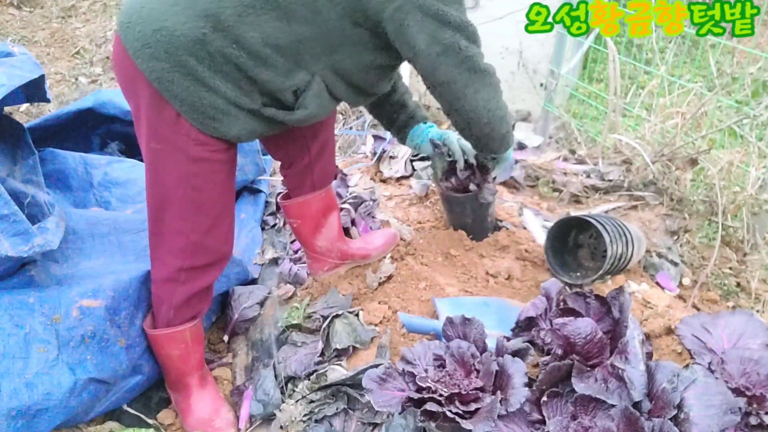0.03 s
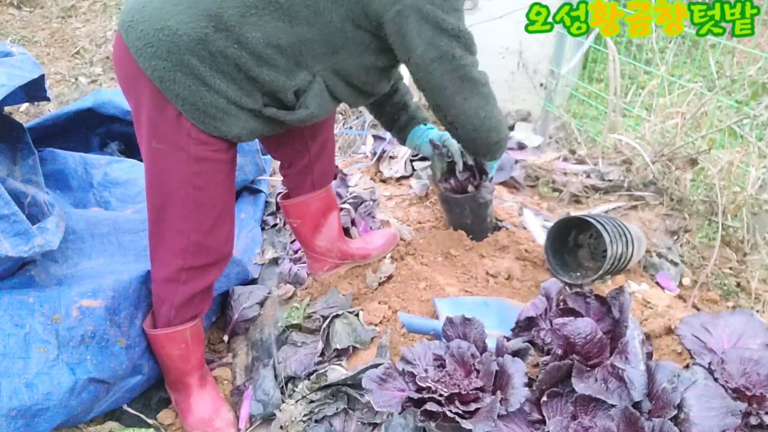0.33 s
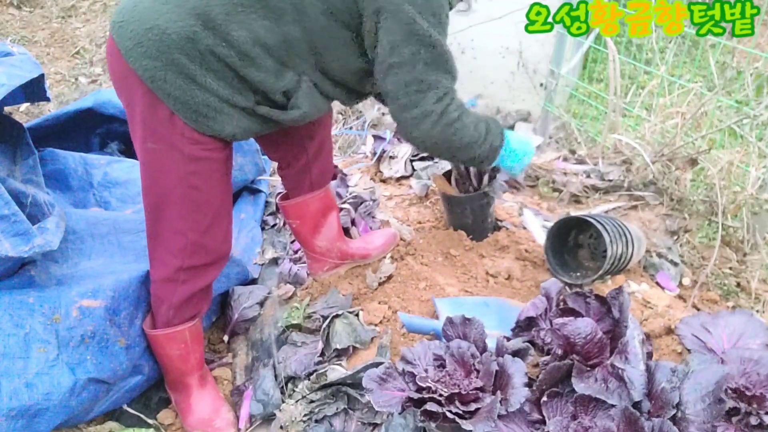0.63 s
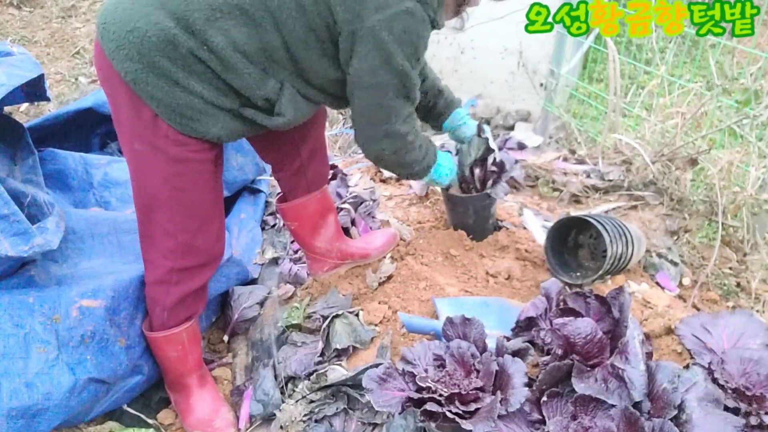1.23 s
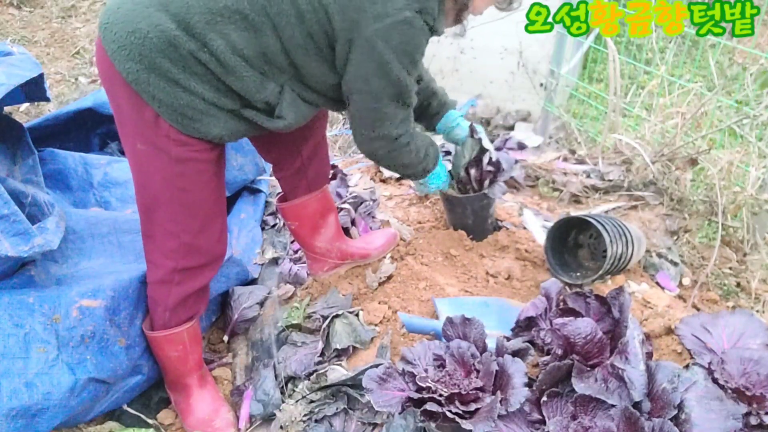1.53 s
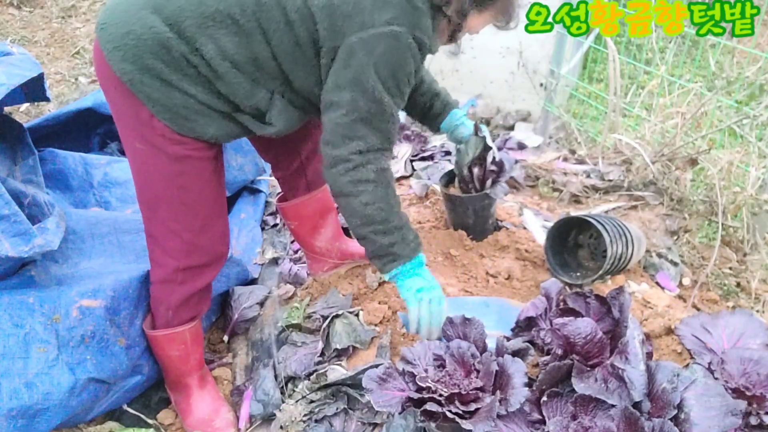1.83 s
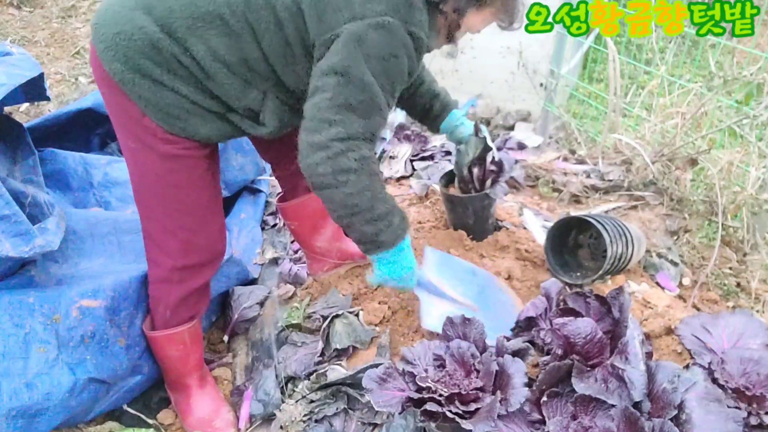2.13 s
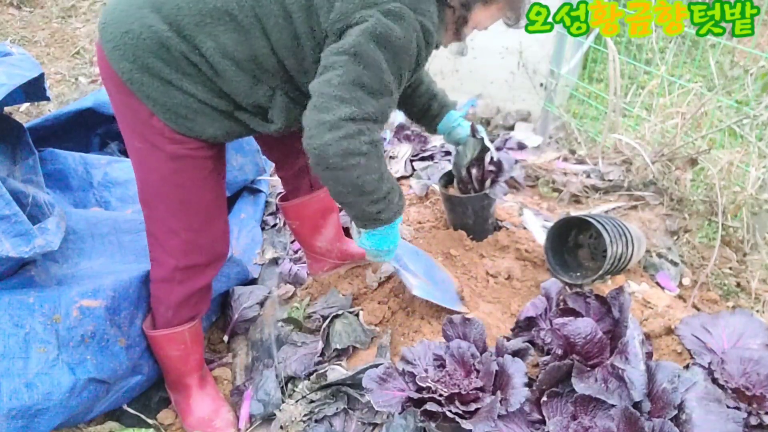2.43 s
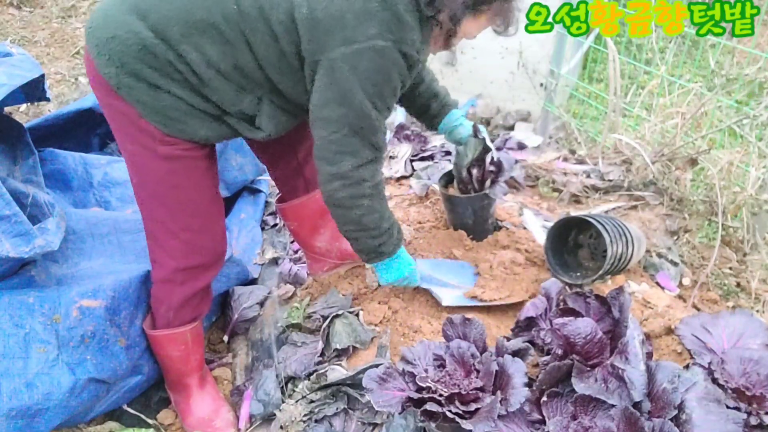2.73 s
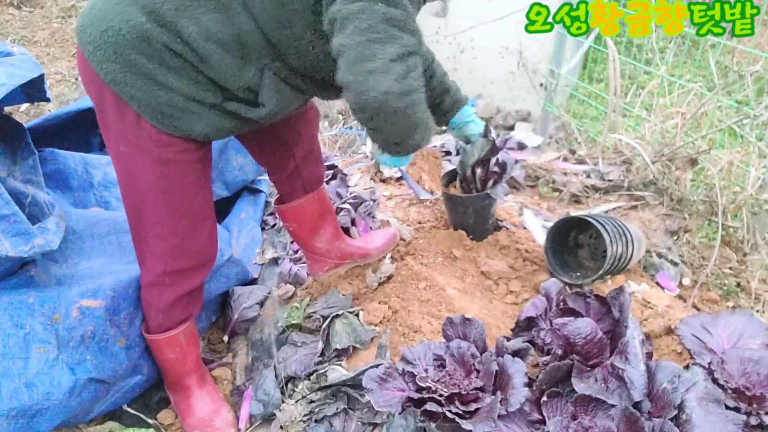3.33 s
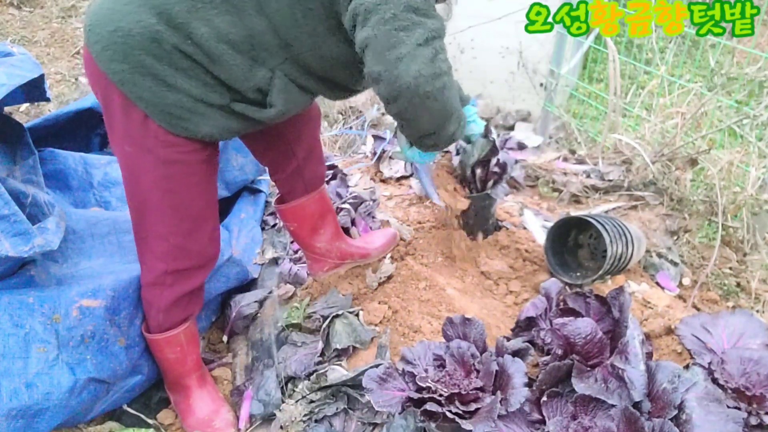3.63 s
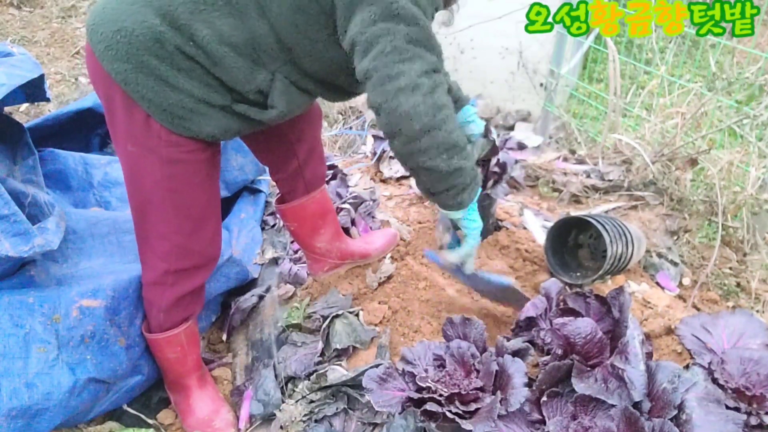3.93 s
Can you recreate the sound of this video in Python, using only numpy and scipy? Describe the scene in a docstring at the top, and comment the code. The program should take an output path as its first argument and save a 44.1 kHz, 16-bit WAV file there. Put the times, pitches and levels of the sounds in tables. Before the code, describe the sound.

Outdoors and close up, a trowel pushes once into stony soil, its blade ringing, after some faint leaf rustling. A light knock on a plant pot and trickling soil follow, while wind and handling noise rumble on the microphone.

```python
"""Outdoors at a plastic plant pot, close up, on a hand-held stereo microphone. A gardener settles a plant,
its leaves crackling, lifts a steel trowel and pushes it once into gritty soil, where grains and small
stones set the blade ringing. The trowel knocks on the rim and crumbs trickle into the pot.
Wind rumbles on the microphone, fingers bump and rub its body, and a hush with a faint drone lies far off."""
import sys
import numpy as np
from scipy import signal
from scipy.fft import rfft, irfft
from scipy.io import wavfile
from scipy.ndimage import uniform_filter1d

SR = 44100
rng = np.random.default_rng(int(sys.argv[2]) if len(sys.argv) > 2 else 0)


def store_wav(level_fs):
    """Save 16-bit WAV to argv[1]."""
    pcm = np.round(np.clip(np.atleast_2d(level_fs), -1, 1) * 32767)
    wavfile.write(sys.argv[1], SR, pcm.T.astype(np.int16))


N = 176400
T = np.arange(N) / SR
LN_1000 = np.log(1000)  # time constants in a t60, a fall of 60 dB


def from_db(db):
    """Decibels to gain."""
    return 10 ** (np.asarray(db) / 20)

def rms_one(x):
    """Scale to unit power."""
    return x / np.sqrt(np.mean(x ** 2) + 1e-20)

def curve(rows, outside=None):
    """Each column of a table, joined by straight lines over time."""
    times, *columns = np.transpose(rows)
    return [np.interp(T, times, column, outside, outside) for column in columns]

def at_hz(points, hz):
    """Read a table on a log-frequency axis."""
    freqs, values = np.transpose(points)
    return np.interp(np.log(hz + 1), np.log(freqs), values)

def pan(db):
    """Constant-power gains, left louder than right by db."""
    return rms_one(from_db(np.array([[db], [-db]]) / 2))

def drift(per_s):
    """A random wander of about unit spread that turns this often."""
    points = np.clip(rng.standard_normal(2048), -2, 2)
    return np.interp(T * per_s, np.arange(len(points)), points)

def swell(s, width):
    """A bell-shaped rise and fall."""
    return np.exp(-.5 * ((T - s) / width) ** 2)

def burst(s, db, decay_s, attack_s):
    """A straight rise, then an exponential decay."""
    rise = np.clip((T - s) / attack_s, 0, 1)
    return from_db(db) * rise * np.exp(-np.maximum(T - s - attack_s, 0) / decay_s)

def ring(x, hz, t60):
    """A resonance: each click sets a damped sine ringing."""
    radius, angle = from_db(-60 / (t60 * SR)), 2 * np.pi * hz / SR
    return signal.lfilter([1, 0, -1], [2, -4 * radius * np.cos(angle), 2 * radius ** 2], x + 1e-18)

def sustained(modes, width=0.39, even_s=0.039):
    """Stereo modes kept ringing by noise, their level evened out over even_s."""
    out = 0
    for hz, db, t60 in modes:
        tone = ring(rng.standard_normal((2, N)), hz, t60)
        mid, side = tone / np.sqrt(uniform_filter1d(tone ** 2, int(even_s * SR)) + 1e-12)
        out += from_db(db) * (mid + width * side * [[1], [-1]])
    return out

def grains(per_s, spread_db):
    """Two streams of tiny random impacts, their sizes scattered by spread_db."""
    chance = rng.random((2, N)) * SR / per_s
    out, hit = np.zeros((2, N)), chance < 1
    sizes = from_db(spread_db * np.minimum(-np.log(chance[hit]), 4))
    out[hit] = np.sign(rng.random((2, N))[hit] - .5) * sizes
    return out

def pings(per_s, spread_db, cycles, patch_db=2.8, patch_s=.014):
    """Grains ring for a few cycles each; the contact point shifts, so each pitch comes and goes."""
    pitches, out = np.geomspace(700, 15000, num=20), 0
    for hz in pitches:
        patch = from_db(patch_db * drift(1 / patch_s))
        clicks = grains(per_s * np.sqrt(hz) / np.sqrt(pitches).sum(), spread_db) * patch
        out += np.sqrt(hz) * rms_one(ring(clicks, hz, cycles / hz))
    return out

def focus(x, hz, db=-7.5, cycles=3.7):
    """A broad resonance favours one pitch region of a texture."""
    return rms_one(x + from_db(db) * rms_one(ring(x, hz, cycles / hz)))

# Sounds close to the microphone. Each row: frequency in Hz, left-right likeness from -1 to 1.
CLOSE_STEREO = [(500, 0.69), (1300, 0.43), (2500, 0.6), (4400, 0.24), (8000, 0.16), (15000, 0)]
def colour(pair, spectrum, likeness=CLOSE_STEREO):
    """Two unrelated signals become one stereo texture of unit power, shaped by this spectrum."""
    hz = np.arange(N // 2 + 1) * SR / N
    alike = np.clip(at_hz(likeness, hz), -1, 1)
    low_cut = np.minimum(hz / spectrum[0][0], 1) ** 2
    mid, side = rfft(pair) * from_db(at_hz(spectrum, hz)) * low_cut
    return rms_one(irfft(np.sqrt(1 + alike) * mid + np.sqrt(1 - alike) * side * [[1], [-1]], N))


# The far hush. Each row: frequency in Hz, relative level in dB.
HUSH_SPECTRUM = [(100, 4), (200, 0.5), (360, 1), (480, -1.5), (650, -3.5), (1000, -17.5), (1600, -21.5),
                 (2500, -31), (5000, -35), (10000, -38), (16000, -43)]
# Its slow swell. Each row: time in seconds, level in dB.
HUSH_LEVEL = [(0, -54.5), (.7, -58), (1.4, -57.5), (2.9, -54), (4, -53)]
# Width of the hush, and of the grip. Each row: frequency in Hz, left-right likeness from -1 to 1.
WIDE_STEREO = [(100, 0.036), (400, 0.59), (1000, 0)]
def far_hush(hush_db=-0.5, drone_db=-9.5):
    """Far from the microphone, a hush and a faint two-note drone swell together."""
    level, = curve(HUSH_LEVEL)
    hush = colour(rng.standard_normal((2, N)), HUSH_SPECTRUM, WIDE_STEREO)
    drone = sustained([(368.3, -2.3, 0.12), (477.7, -4, 0.54)], even_s=0.15)
    return from_db(level) * (from_db(hush_db) * hush + from_db(drone_db) * drone)


# Wind right on the microphone. Each row: time in seconds, relative level in dB.
WIND_STRENGTH = [(0.0, -39.5), (0.08, -37), (0.27, -43), (0.36, -32), (0.46, -43), (0.49, -36.5),
                 (0.77, -46.5), (1.44, -40), (2.36, -39), (2.44, -31.5), (2.66, -51), (2.75, -37.5),
                 (3.19, -38.5), (3.22, -43), (3.24, -37.5), (3.3, -36.5), (3.93, -38), (4.0, -31.5)]
# Its rumble. Each row: frequency in Hz, relative level in dB.
WIND_SPECTRUM = [(15, -18), (25, -4.5), (40, -5), (60, 0), (90, -6), (120, -16.5), (160, -24.5), (250, -34),
                 (400, -40), (800, -56.5), (4000, -97.5)]
# Its width. Each row: frequency in Hz, left-right likeness from -1 to 1.
WIND_STEREO = [(30, 0.12), (200, 0.35)]
# Gusts. Each row: peak in seconds, level in dB, width in seconds, pan in dB, typical pitch in Hz.
GUSTS = [(0.071, -21.5, 0.013, -7, 55), (0.168, -21, 0.0062, -7, 70), (0.348, -20, 0.029, -2.5, 56.2),
         (0.507, -47, 0.0054, -8, 59), (1.463, -19.5, 0.0029, -1, 55.5), (1.732, -27, 0.026, 1.5, 49.3),
         (1.979, -21.5, 0.0042, 19, 57), (2.388, -24.5, 0.0063, -20, 86), (2.457, -21.5, 0.015, -3, 63),
         (3.251, -15.5, 0.0048, -17, 65)]
def wind(rumble_db=4, pitch_spread=0.18):
    """Wind rumbles almost separately at each microphone port, and gusts buffet both."""
    level, = curve(WIND_STRENGTH)
    rumble = colour(rng.standard_normal((2, N)), WIND_SPECTRUM, WIND_STEREO)
    rumble /= np.sqrt(uniform_filter1d(rumble ** 2, size=7000))
    out = pan(-0.82) * from_db(level + rumble_db) * rumble
    for s, db, width, pan_db, typical_hz in GUSTS:
        hz = typical_hz * np.exp(pitch_spread * rng.standard_normal((2, 1)))
        phase = rng.random() + rng.normal(0, 0.1, (2, 1))
        out += pan(pan_db) * from_db(db) * swell(s, width) * np.sin(2 * np.pi * (hz * (T - s) + phase))
    return out


# Leaves and gloves, close by. Each row: peak in seconds, level in dB, width in seconds, favoured Hz.
LEAF_SWELLS = [(0.1, -64, 0.026, 4540), (0.234, -65.5, 0.033, 6200), (0.316, -70.5, 0.0094, 2600),
               (0.349, -65, 0.014, 11000), (0.384, -67, 0.016, 11500), (.458, -67.5, 0.031, 2500),
               (0.584, -65.5, 0.03, 4700), (.69, -72.5, 0.061, 7000), (.86, -73.5, 0.072, 4720),
               (1.071, -67, 0.041, 2940), (1.198, -65, 0.04, 6260), (1.34, -74, 0.041, 3270),
               (1.452, -72, 0.016, 1480), (1.514, -65.5, 0.02, 5760), (1.56, -70, 0.017, 5500),
               (1.753, -72.5, 0.011, 4800), (1.785, -71.5, 0.021, 7000), (2.08, -76, 0.091, 1460),
               (2.94, -70.5, 0.027, 3460)]
# Single stalks and crumbs snap. Each row: start in seconds, level in dB, favoured Hz.
STALK_SNAPS = [(.074, -54, 1700), (0.098, -52.5, 5940), (0.222, -63, 3120), (0.31, -66, 1600),
               (0.347, -53.5, 7000), (0.377, -57.5, 9000), (0.422, -59.5, 6500), (0.577, -62.5, 4630),
               (0.948, -67, 7500), (1.047, -62, 2300), (1.066, -57, 3500), (1.152, -66, 3000),
               (1.189, -61, 1700), (1.445, -64, 4000), (1.469, -64, 6000), (1.492, -65, 4100),
               (1.515, -58, 5500), (1.59, -68, 7500), (1.747, -69, 4970), (2.928, -64.5, 3000),
               (3.034, -69, 5000), (3.071, -64.5, 5000), (3.119, -67, 5000), (3.307, -68, 4430),
               (3.363, -72.5, 5000)]
# The tone of the leaves. Each row: frequency in Hz, relative level in dB.
LEAF_SPECTRUM = [(500, 4), (1200, 7.5), (2200, 4), (3500, 2), (5500, 1), (7500, -2), (9500, -7),
                 (16000, -3.5)]
def leaves(tick_db=-84, snap_s=0.0054):
    """Handled leaves give swells of fine crackle and single snaps, with stray ticks between."""
    crackle = colour(pings(4200, spread_db=1.5, cycles=12), LEAF_SPECTRUM)
    crack = colour(rng.standard_normal((2, N)), LEAF_SPECTRUM)
    swells = sum(from_db(db) * swell(s, width) * focus(crackle, hz) for s, db, width, hz in LEAF_SWELLS)
    snaps = sum(burst(s, db, snap_s, attack_s=0.00049) * focus(crack, hz) for s, db, hz in STALK_SNAPS)
    ticks = from_db(tick_db) * colour(pings(250, spread_db=5.0, cycles=4.8), LEAF_SPECTRUM)
    return swells + snaps + ticks


# Bumps on the microphone. Each row: start in seconds, relative level in dB, typical Hz, pan in dB.
FINGER_BUMPS = [(0.085, -37, 271, -26), (0.16, -32.5, 128, -14), (0.191, -34, 150, -5),
                (0.546, -38, 196.3, 4), (0.833, -36, 133, 2), (0.961, -39, 185.5, -1),
                (1.017, -38, 141, -1), (1.146, -37, 181, -2), (1.229, -39, 195, 7), (1.376, -42, 430, 2),
                (1.404, -35.5, 216, -5), (1.436, -29.5, 254, -1), (1.618, -33.5, 236, 23),
                (1.737, -36, 144, -21), (1.948, -37.5, 158, 22), (2.126, -43.5, 218, 10),
                (2.373, -30, 152, -20), (2.449, -26, 140.5, -7), (3.222, -30.5, 199, -23),
                (3.383, -35, 119, -14), (3.674, -36, 173, 6), (3.781, -28.5, 208, -25)]
def finger_bumps(gain_db=1, cycles=12.6, pitch_spread=0.062, upper_ratio=1.7, upper_db=-9):
    """Fingers shift on the microphone's body: each bump is a dull, quickly damped pair of modes."""
    out = np.zeros((2, N))
    for s, db, hz, pan_db in FINGER_BUMPS:
        for ratio, mode_db in ((1, 0), (upper_ratio, upper_db)):
            pitch = hz * ratio * np.exp(pitch_spread * rng.standard_normal())
            phase = rng.random() + rng.normal(0, 0.16, (2, 1))
            envelope = burst(s, db + gain_db + mode_db, cycles / pitch / LN_1000, attack_s=0.0036)
            out += pan(pan_db) * envelope * np.sin(2 * np.pi * (pitch * (T - s) + phase))
    return signal.sosfilt(signal.butter(4, 1000, fs=SR, output="sos"), out + 1e-18)


# The hand rubs on the microphone. Each row: peak in seconds, level in dB, width in seconds.
GRIP_RUBS = [(.13, -46.5, 0.12), (.61, -48, 0.069), (.93, -48, 0.09), (1.3, -43.5, 0.16),
             (1.69, -43.5, 0.069), (2.422, -49.5, 0.04)]
# The tone of the rubbing. Each row: frequency in Hz, relative level in dB.
GRIP_SPECTRUM = [(100, 4), (160, 2.5), (250, -12), (400, -35.5), (800, -45), (3000, -54.5)]
def grip(slip_db=4, slips_per_s=35):
    """Skin drags on the microphone's body in muffled fits and starts."""
    pressure = sum(from_db(db) * swell(s, width) for s, db, width in GRIP_RUBS)
    slips = from_db(slip_db * drift(slips_per_s))
    return pressure * slips * colour(rng.standard_normal((2, N)), GRIP_SPECTRUM, WIDE_STEREO)


# Squeaks, a little left. Each row: peak in seconds, level in dB, width in seconds, pitch in Hz.
STICK_SLIPS = [(1.568, -72, 0.0096, 3000), (2.458, -64, 0.0047, 2400), (2.572, -53.5, 0.014, 7030),
               (2.631, -56, 0.005, 5300), (2.667, -40.5, 0.0044, 3270), (2.667, -39.5, 0.0032, 6650),
               (2.703, -52, 0.0041, 7750), (2.727, -51.5, 0.0059, 5930), (2.729, -51, .005, 7400)]
def squeaks(cycles=120):
    """Glove on leaf, or stone on steel, sticks and slips for an instant around one pitch."""
    return pan(2.9) * sum(swell(s, width) * sustained([(hz, db, cycles / hz)], width=0.38, even_s=0.0095)
                          for s, db, width, hz in STICK_SLIPS)


# The lifted blade. Each row: pitch in Hz, relative level in dB, t60 in seconds.
FREE_BLADE_MODES = [(1240, 0, 0.68), (2500, -5.5, 0.48)]
def trowel_lift(start_s=2.19, level_db=-70):
    """The free blade rings faintly as it leaves the ground."""
    return sum(burst(start_s, level_db, t60 / LN_1000, attack_s=0.02) * sustained([(hz, db, t60)])
               for hz, db, t60 in FREE_BLADE_MODES)


# The blade's weaker modes in the soil. Each row: pitch in Hz, relative level in dB.
BURIED_BLADE_MODES = [(1150, -10), (1247, -2.5), (1965, -15), (2420, -14.5), (2686, -13), (3050, -10),
                      (3200, -10), (3450, -12), (3736, -11), (3880, -14.5), (4730, -10.5), (5000, -23),
                      (5350, -10), (5750, -19), (6100, -12), (6500, -22), (6826, -16), (7040, -10),
                      (7600, -17), (7860, -22), (9750, -20)]
def blade_ring(t60=0.083, bend_s=.00012, wander_db=2.5, wander_per_s=45):
    """Coarse grains strike the blade; each mode swells and fades as the contact moves along it."""
    hits, out = grains(3000, spread_db=0), 0
    for hz, db in BURIED_BLADE_MODES:
        bent_time = T + bend_s * drift(wander_per_s)  # pressing soil detunes the mode
        mid, side = [np.interp(bent_time, T, x) for x in rms_one(ring(hits, hz, t60))]
        out += from_db(db + wander_db * drift(wander_per_s)) * (mid + .5 * side * [[1], [-1]])
    return out


# The blade flexes. Each row: time in seconds, relative levels of the low and upper mode in dB.
BENDING_LEVELS = [(2.44, -77, -100), (2.486, -67, -79), (2.536, -35, -65), (2.592, -60, -78),
                  (2.624, -72, -59.5), (2.672, -46.5, -55.5), (2.706, -42.5, -66), (2.732, -53, -58.5),
                  (2.774, -74, -89), (2.8, -79, -87)]
def blade_bending(port_lag_s=.00006):
    """Two main bending modes swell as the blade sinks in, reaching the right port slightly later."""
    low_db, upper_db = curve(BENDING_LEVELS, outside=-140)
    low = from_db(low_db) * sustained([(1268, -3, 0.28)], width=.12, even_s=0.012)
    upper = from_db(upper_db) * sustained([(1683, 9, 0.12)], width=0.25, even_s=0.038)
    left, right = pan(-2.5) * low + pan(2.3) * upper
    return np.array([left, np.interp(T - port_lag_s, T, right)])


# One push into the soil, close by. Each row: time in seconds, relative force in dB.
PUSH_FORCE = [(2.435, -98), (2.457, -63), (2.478, -56), (2.505, -47), (2.54, -41.5), (2.556, -50.5),
              (2.574, -43), (2.592, -49.5), (2.63, -42), (2.655, -45.5), (2.68, -43), (2.693, -42.5),
              (2.728, -44.5), (2.75, -58), (2.81, -78)]
# Grit on steel. Each row: frequency in Hz, relative level in dB.
GRIT_SPECTRUM = [(400, -37), (780, 6.5), (900, -8.5), (1080, 5), (1380, -5), (1500, -23), (1850, -5.5),
                 (2200, -2.5), (3100, -0.5), (3900, -3.5), (4250, -3), (4700, 2), (6000, -5.5), (6800, 0.5),
                 (8600, -5.5), (12000, -5.5), (16000, -7)]
# Stones catch. Each row: start in seconds, level in dB, decay in seconds.
STONE_CATCHES = [(2.508, -47, 0.0028), (2.567, -48, .004), (2.612, -41, 0.0057), (2.628, -43, 0.0037),
                 (2.664, -31, 0.005), (2.673, -43, 0.0055), (2.698, -47, 0.0032)]
# Stone on steel. Each row: frequency in Hz, relative level in dB.
STONE_SPECTRUM = [(900, -24), (2200, -6), (3250, 10), (4100, -3.5), (5000, 6), (6800, -4), (8200, -5.5),
                  (16000, -25)]
def trowel_push(grit_db=-2, ring_db=-5.5):
    """Grit grinds along the blade and sets it ringing; small stones catch on the edge."""
    force, = from_db(curve(PUSH_FORCE, outside=-140))
    grit = from_db(grit_db) * colour(pings(18000, spread_db=2.0, cycles=23), GRIT_SPECTRUM)
    catches = sum(burst(s, db, decay, attack_s=0.0011) for s, db, decay in STONE_CATCHES)
    stones = catches * colour(pings(15000, spread_db=3.0, cycles=16), STONE_SPECTRUM)
    bending = blade_bending()
    return pan(0.5) * (force * (grit + from_db(ring_db) * blade_ring()) + stones) + bending


# Knocks on the rim, close by. Each row: start in seconds, level in dB, decay in seconds, favoured Hz.
RIM_KNOCKS = [(3.5304, -41.5, 0.0065, 1470), (3.541, -44, 0.0078, 5200), (3.609, -55, 0.023, 1500)]
# Their crunch. Each row: frequency in Hz, relative level in dB.
KNOCK_SPECTRUM = [(300, 6.5), (520, 11), (950, -14), (1400, 0), (2300, -8), (3200, -6), (3900, -5.5),
                  (5000, -3), (6200, -13), (7600, -16.5), (10000, -16), (16000, -30)]
# Trowel and pot together. Each row: pitch in Hz, relative level in dB, t60 in seconds.
RIM_MODES = [(523.4, 15.5, 0.036), (1440, -11, 0.38), (1703, 6, 0.2), (1860, -12, 0.3), (2054, 0, 0.14),
             (2480, -1, 0.1), (2790, -7.5, 0.36), (3090, -1, 0.12), (3290, 2, 0.11), (4730, -6, 0.25),
             (5730, -18, .12), (7340, -10, 0.2)]
def rim_knock(ring_db=-53, chatter_cycles=0.12, chatter_per_s=270):
    """The trowel crunches on the rim; both ring from the first knock, wobbling as the blade chatters."""
    grit = colour(grains(5000, spread_db=1), KNOCK_SPECTRUM)
    out = sum(burst(s, db, decay, attack_s=0.003) * focus(grit, hz) for s, db, decay, hz in RIM_KNOCKS)
    first_knock_s = RIM_KNOCKS[0][0]
    for hz, db, t60 in RIM_MODES:
        phase = rng.random() + rng.normal(0, 0.06, (2, 1)) + chatter_cycles * drift(chatter_per_s)
        envelope = burst(first_knock_s, ring_db + db, t60 / LN_1000, attack_s=0.0083)
        out += envelope * np.sin(2 * np.pi * (hz * T + phase))
    return out


# Soil falls, close by. Each row: start in seconds, level in dB, decay in seconds, favoured Hz.
TRICKLES = [(3.537, -58, 0.04, 4530), (3.602, -60, 0.021, 7500), (3.65, -63.5, 0.036, 4400),
            (3.675, -75, .05, 4170), (3.726, -64.5, 0.06, 7600), (3.904, -69.5, 0.056, 5060)]
# The tone of the falling soil. Each row: frequency in Hz, relative level in dB.
CRUMB_SPECTRUM = [(600, 11), (1600, 9.5), (3000, 4), (4800, 3.5), (7500, -1), (10000, -6.5), (16000, -1)]
def crumbs():
    """Soil slides off the blade into the pot in short showers of tiny impacts."""
    soil = colour(pings(2000, spread_db=1.0, cycles=13), CRUMB_SPECTRUM)
    return sum(burst(s, db, decay, attack_s=0.0035) * focus(soil, hz) for s, db, decay, hz in TRICKLES)


def scene():
    """The close work at the pot, wind and hand on the microphone, and the hush beyond."""
    potting = trowel_push() + squeaks() + trowel_lift() + pan(-0.6) * (rim_knock() + crumbs()) + leaves()
    return potting + wind() + finger_bumps() + grip() + far_hush()

def record(dry):
    """The treble is cut steeply above 15.8 kHz."""
    return signal.sosfilt(signal.ellip(12, .1, 80, 15800, fs=SR, output="sos"), dry)


dry = scene()
out = record(dry)
store_wav(out)
```